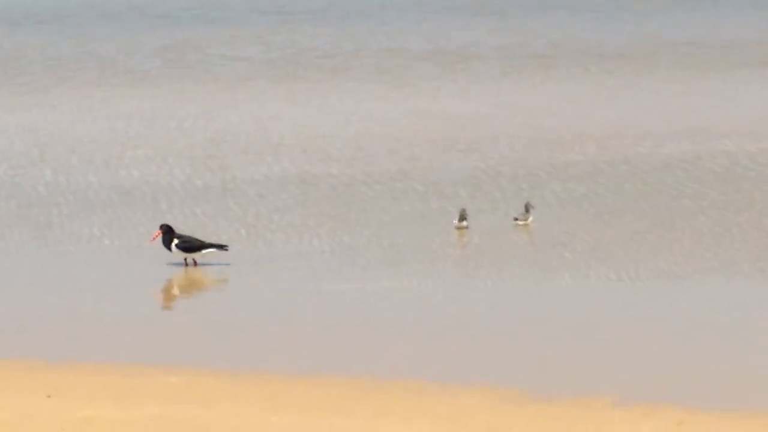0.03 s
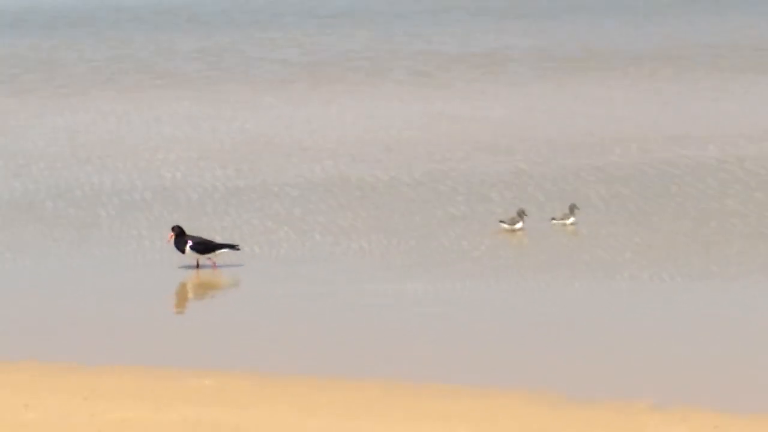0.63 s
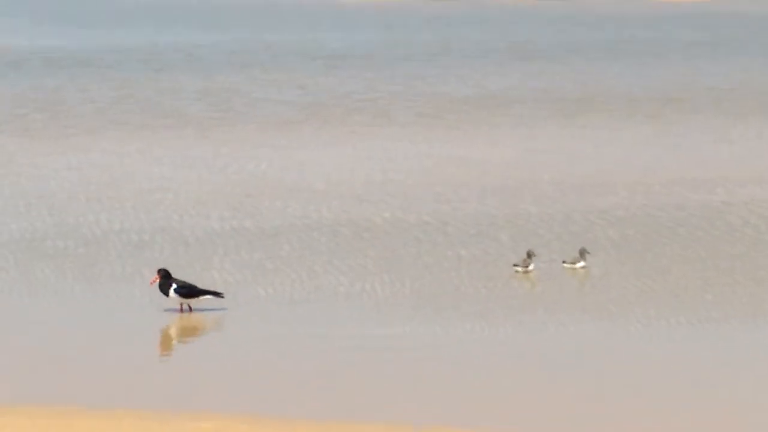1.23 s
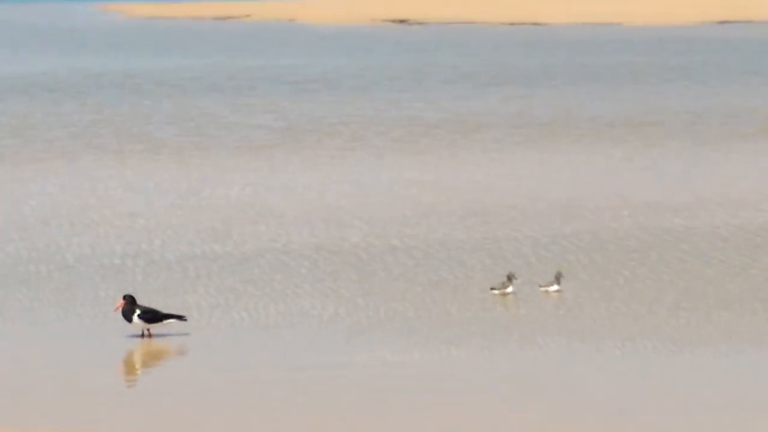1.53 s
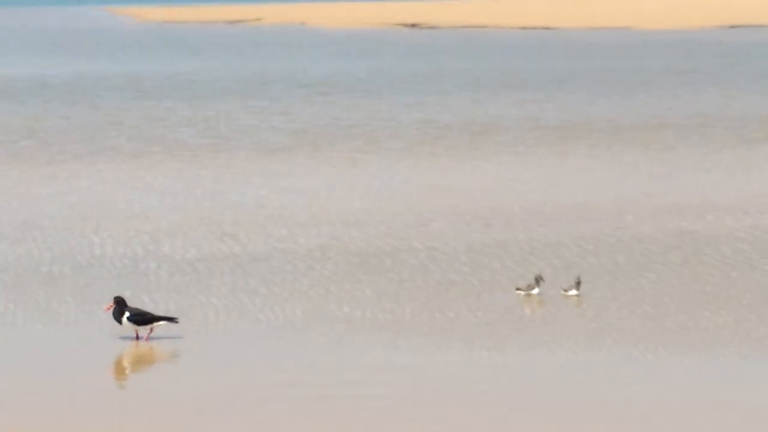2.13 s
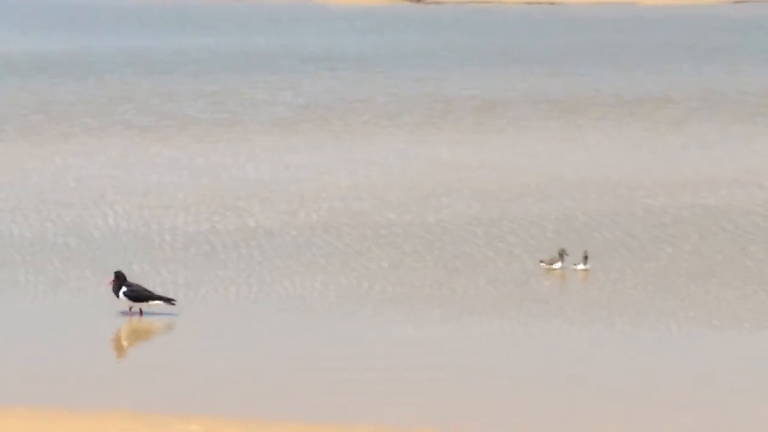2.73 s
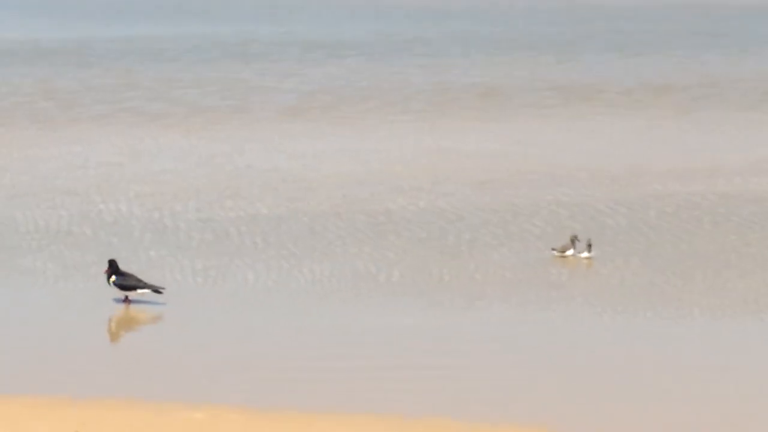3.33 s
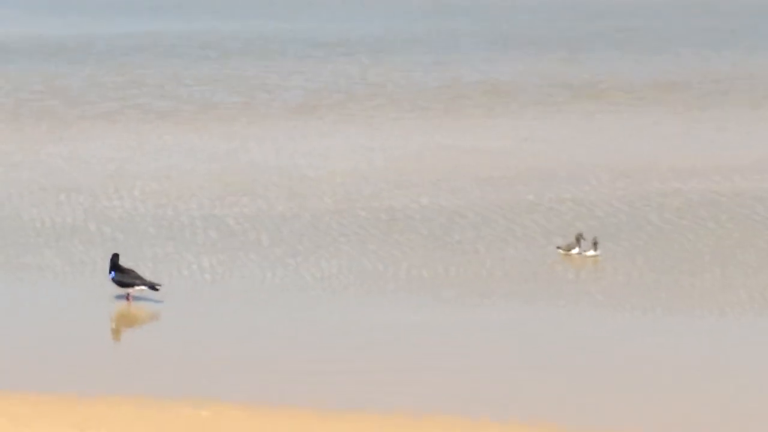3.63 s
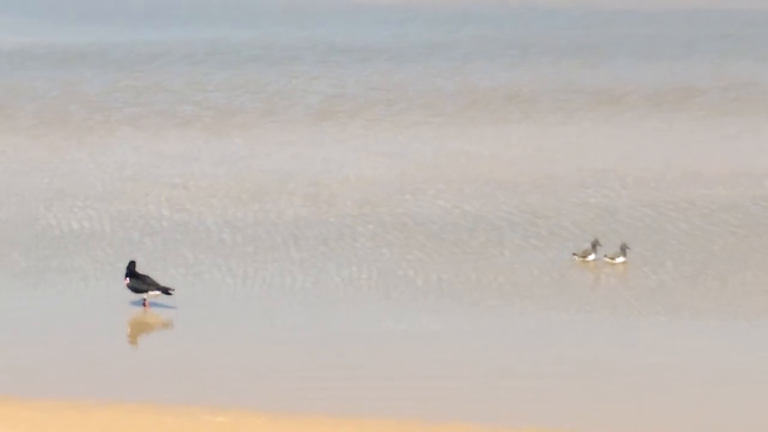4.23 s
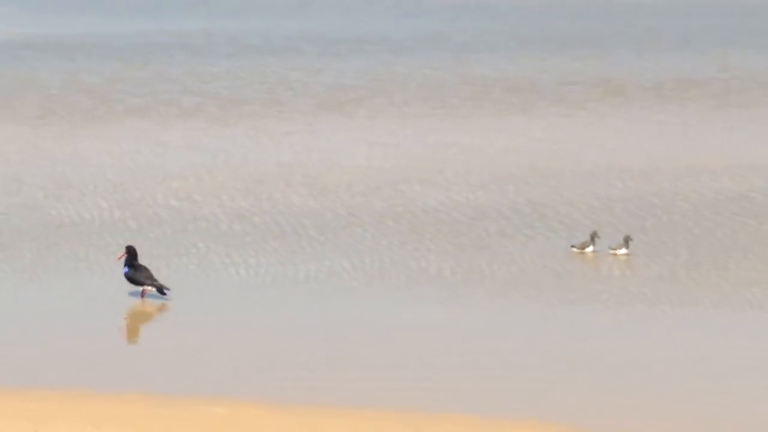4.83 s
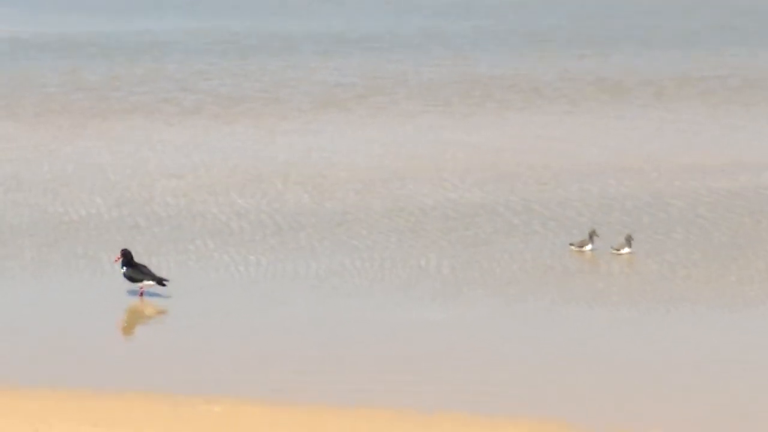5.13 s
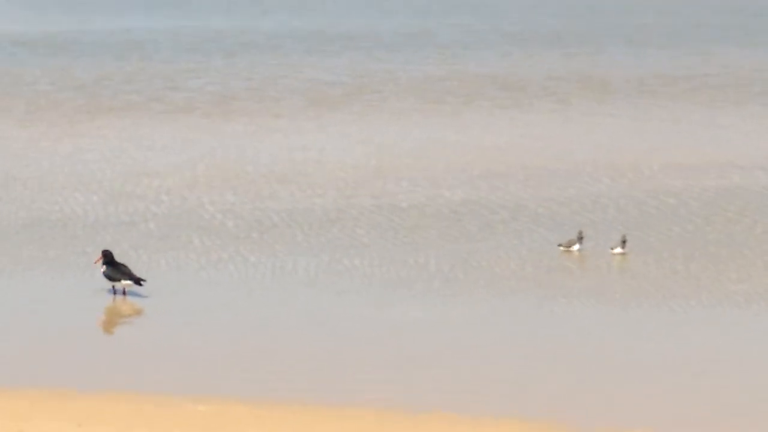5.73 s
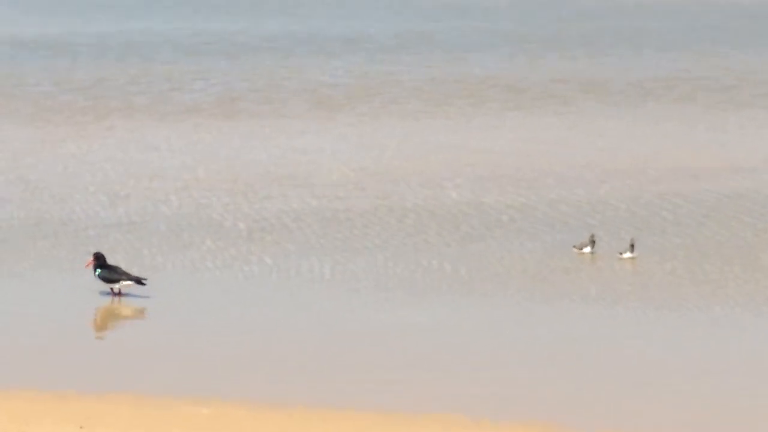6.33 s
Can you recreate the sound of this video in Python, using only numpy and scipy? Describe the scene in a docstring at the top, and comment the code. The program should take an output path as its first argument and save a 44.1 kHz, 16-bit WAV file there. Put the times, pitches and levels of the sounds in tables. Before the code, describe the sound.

Low wind rumbles on the microphone from start to finish, about six and a half seconds, heavier on the left and surging several times a second. Irregular short thumps strike each side separately. Gusts sputter on the right during the first second, again around 3 and 3.7 seconds, and more softly later. Underneath, distant water makes a faint, even hiss.

A shorebird on the open tidal flat gives four single, sharp, high pips, at about 0.2, 1.1, 3.1 and 5.4 seconds. Each is very brief, rising and falling quickly in pitch with a bright, slightly rough edge. The first two are the strongest and the third is the softest. At about 5.7 seconds a farther bird gives one much fainter short whistle that slurs up and then down. The calls leave only a slight, short, dull echo.

```python
"""Wind rumbles and buffets two microphone ports, each on its own, over a soft, steady hiss. The wind is
turbulent noise plus eddies, each a brief pressure dip. An oystercatcher gives four sharp pips on the tidal
flat: arched notes whose overtones sweep through its throat resonances. Near the end a farther shorebird
whistles once. Sand and ripples return a faint echo of both birds."""
import sys
import numpy as np
from scipy import signal
from scipy.fft import rfft, irfft
from scipy.io import wavfile
from scipy.ndimage import uniform_filter1d

SR = 44100
rng = np.random.default_rng(int(sys.argv[2]) if len(sys.argv) > 2 else 0)


def transcribe(signal):
    """Save signal, clipped to [-1, 1], as a 16-bit WAV file at the path in sys.argv[1]."""
    frames = np.atleast_2d(signal).T
    limited = np.clip(frames, -1, 1)
    pcm = np.round(limited * 32767).astype(np.int16)
    wavfile.write(sys.argv[1], SR, pcm)


N = 290178
TIME_S = np.arange(N) / SR

# Wind strength on the ports. Each row: time in seconds, left level in dB, right level in dB.
BREEZE_DB = [(0.0, -12.5, -27), (0.15, -24.5, -28.5), (0.3, -19.5, -29.5), (0.7, -15.5, -28.5),
             (1.0, -22.5, -29), (1.25, -17.5, -27.5), (1.6, -21, -31), (2.0, -27.5, -31), (2.2, -24, -28.5),
             (2.65, -21.5, -35), (2.92, -20, -23), (3.5, -20, -33.5), (4.05, -18.5, -29),
             (4.55, -20.5, -33.5), (5.25, -20, -28.5), (5.8, -19, -29), (6.15, -20, -32.5),
             (6.58, -18.5, -30.5)]
# Rumble spectrum. Each row: frequency in Hz, relative density in dB.
RUMBLE_SPECTRUM = [(10, -33.5), (22, -17), (43, -5.5), (70, 2), (105, -3), (150, -4.5), (220, -9.5),
                   (330, -14.5), (500, -24), (750, -40.5), (1200, -50), (2500, -87)]
# Deep bass of the rumble. Each row: time in seconds, gain in dB.
DEEP_BASS_DB = [(0, 1), (.7, 2.5), (1.2, 1.5), (1.8, -1), (2.2, 4), (2.8, -2), (4.1, 1), (4.7, -3),
                (5.3, 2), (6.58, -3.5)]
# Port response to eddies. Each row: frequency in Hz, gain in dB.
PORT_RESPONSE = [(200, 1), (350, 0.5), (550, 0), (780, 1), (1050, 1), (1500, 0.5), (2500, -2.5),
                 (4000, -6.5), (7000, -11.5), (12000, -41)]
# Port low end, left then right. Each row: bass cut in Hz, wake strength as a factor.
PORT_LOW_END = [(81.5, 0.36), (58.7, 0.71)]
# Small buffets, left then right. Each row: rate per second, level re the breeze in dB, roll-off in Hz.
SMALL_BUFFETS = [(11, -5.5, 165), (9, -7, 240)]
# Steady hiss. Each row: time in seconds, left and right level in dB before trim.
HISS_DB = [(0, -66, -64), (2, -66, -64.5), (4.4, -66.5, -64.5), (5.4, -64, -63), (6.58, -66, -63.5)]
# Hiss spectrum. Each row: frequency in Hz, relative density in dB.
HISS_SPECTRUM = [(100, -8), (500, 5.5), (1000, 0), (1600, 1.5), (2300, -0.5), (3200, -5), (4500, -11),
                 (6000, -15), (9000, -17), (13000, -18.5), (15700, -20.5)]
# Hard buffets. Each row: centre in seconds, port (0 left, 1 right), level in dB before trim,
# roll-off in Hz, spread in seconds.
HARD_BUFFETS = [(.092, 1, -13.5, 800, .0018), (.096, 1, -22, 480, .002), (.113, 1, -29, 647, .0048),
                (.176, 1, -21.5, 440, .0011), (.224, 1, -21, 160, .002), (.245, 1, -13, 198, .006),
                (.249, 0, -15, 200, .0015), (.266, 1, -19.5, 650, .002), (.273, 0, -16.5, 200, .0012),
                (.279, 1, -22, 520, .002), (.304, 0, -17, 190, .002), (.305, 1, -22, 330, .002),
                (.315, 1, -22, 720, .001), (.321, 1, -21, 380, .002), (.335, 0, -16, 200, .002),
                (.357, 1, -23.5, 690, .002), (.410, 1, -26, 400, .002), (.428, 1, -24, 280, .002),
                (.450, 1, -32, 480, .002), (.481, 0, -19, 150, .002), (.496, 0, -20.5, 320, .001),
                (.523, 1, -17.5, 250, .003), (.555, 1, -11.5, 520, .0009), (.573, 1, -30, 560, .001),
                (.615, 0, -18, 160, .0029), (.619, 1, -17.5, 410, .006), (.624, 1, -25, 650, .0006),
                (.629, 0, -18, 190, .002), (.698, 0, -16, 160, .002), (.714, 1, -26, 340, .002),
                (.719, 0, -13, 230, .0069), (.737, 1, -19, 600, .0007), (.782, 1, -22, 1200, .0016),
                (.787, 1, -14.5, 300, .003), (.807, 1, -25, 260, .003), (.815, 0, -20, 150, .002),
                (.945, 0, -14, 370, .0018), (.98, 0, -12, 260, .005), (.993, 0, -17.5, 280, .0015),
                (1.035, 1, -33, 330, .0015), (1.119, 0, -19, 200, .003), (1.198, 0, -14.5, 200, .003),
                (1.224, 0, -18, 140, .002), (1.241, 0, -16, 160, .002), (1.259, 1, -21.5, 440, .0012),
                (1.299, 0, -21, 280, .0012), (1.403, 0, -18, 140, .002), (1.454, 1, -25.5, 480, .0012),
                (1.464, 1, -29, 380, .002), (1.494, 1, -25, 290, .002), (1.569, 1, -27, 260, .0015),
                (1.662, 0, -20, 140, .003), (1.732, 0, -20, 165, .002), (1.806, 0, -24, 200, .003),
                (1.864, 0, -13, 200, .003), (1.893, 0, -19.5, 190, .003), (2.062, 0, -16.5, 230, .0023),
                (2.10, 0, -23, 242, .007), (2.127, 0, -19, 190, .002), (2.255, 0, -25, 210, .003),
                (2.281, 0, -21, 175, .005), (2.351, 0, -23, 140, .002), (2.431, 0, -23.5, 210, .002),
                (2.487, 0, -13, 195, .0012), (2.524, 0, -18.5, 200, .009), (2.702, 0, -17, 190, .0015),
                (2.811, 1, -19, 470, .0015), (2.825, 1, -26, 380, .0015), (2.849, 0, -19, 185, .002),
                (2.868, 1, -22.5, 420, .001), (2.901, 0, -15.5, 151, .014), (2.932, 1, -21, 290, .003),
                (2.962, 1, -19.5, 480, .00094), (2.979, 1, -20, 500, .004), (2.981, 1, -16, 140, .0027),
                (2.984, 0, -10.5, 210, .0027), (3.025, 1, -16.5, 720, .0009), (3.029, 1, -19, 180, .0015),
                (3.113, 1, -24.5, 600, .0016), (3.158, 0, -19.5, 188, .0024), (3.193, 0, -22.5, 170, .004),
                (3.37, 0, -21, 130, .002), (3.435, 0, -20, 160, .002), (3.465, 0, -19.5, 160, .002),
                (3.541, 0, -20, 150, .005), (3.564, 1, -31, 370, .0015), (3.686, 0, -21, 208, .0048),
                (3.706, 1, -17.5, 640, .002), (3.715, 1, -22, 720, .002), (3.726, 1, -20, 700, .0008),
                (3.731, 0, -16.5, 200, .003), (3.747, 1, -32, 420, .001), (3.80, 1, -31, 320, .003),
                (3.828, 1, -24, 480, .0016), (3.845, 1, -29, 270, .002), (3.941, 1, -27, 400, .004),
                (3.945, 0, -16, 170, .005), (4.001, 0, -12, 270, .0024), (4.071, 1, -24.5, 340, .004),
                (4.189, 0, -19, 220, .0051), (4.226, 1, -30, 450, .002), (4.264, 1, -27, 500, .0016),
                (4.626, 0, -17, 161, .007), (4.745, 0, -17.5, 156, .0091), (4.85, 0, -25, 190, .004),
                (4.953, 1, -24, 450, .0011), (4.981, 0, -12, 165, .0016), (4.988, 1, -22, 950, .0014),
                (5.008, 1, -24, 420, .002), (5.037, 1, -27, 480, .0012), (5.054, 1, -22, 460, .003),
                (5.118, 0, -16, 173, .0022), (5.118, 1, -27, 420, .002), (5.189, 0, -21, 250, .003),
                (5.227, 0, -21, 213, .0033), (5.283, 0, -20, 120, .003), (5.304, 0, -17.5, 240, .005),
                (5.367, 0, -16, 190, .002), (5.378, 0, -19, 250, .003), (5.553, 0, -17, 165, .002),
                (5.554, 1, -27, 370, .0015), (5.697, 0, -21.5, 260, .0057), (5.757, 0, -13.5, 290, .005),
                (5.79, 1, -32, 420, .002), (5.804, 1, -31, 450, .002), (5.817, 1, -31, 560, .002),
                (5.853, 1, -27, 260, .003), (5.897, 1, -25, 400, .0015), (5.911, 1, -21.5, 400, .003),
                (6.0, 1, -27, 180, .002), (6.083, 0, -17.5, 184, .0042), (6.202, 0, -18, 200, .002),
                (6.364, 0, -24.5, 190, .0022), (6.486, 0, -19, 125, .002), (6.516, 1, -17, 470, .0007),
                (6.553, 1, -21, 300, .0029), (6.57, 1, -21.5, 420, .0006)]
# Pips. Each row: start in seconds, length in seconds, top pitch in Hz, level in dB before the throat,
# tilt in dB per harmonic, octave gain in dB, lean (under 1 rises sooner), half the break's dip in dB.
PIP_NOTES = [(.2325, .046, 2195, -29, .3, 7, .84, -6), (1.119, .053, 2120, -29, .3, 3, 1, -1),
             (3.138, .047, 2095, -36.5, -.4, 3, .97, -.5), (5.389, .043, 2165, -32.5, -.3, 2.5, .97, 0)]
# Arch of a pip. Each row: share of the length, pitch as a factor on the top, note level in dB,
# upper overtone level in dB.
PIP_ARCH = [(0, .57, -22, -50), (.14, .72, -13, -28), (.2, .82, -9, -7), (.28, .94, -2, -2),
            (.39, .985, 0, 0), (.53, 1, 0, 0), (.69, .982, -.5, -2), (.8, .94, -3, -8), (.9, .85, -13, -34),
            (1, .79, -26, -50)]
# Throat response at the ports. Each row: frequency in Hz, left gain in dB, right gain in dB.
THROAT_RESPONSE = [(1200, -11, -2), (1750, 0, -8.5), (1960, -3, 1.5), (2090, -5, -1.5), (2170, -3.5, -1.5),
                   (2304, -5, 1), (2930, -9.5, -15), (3920, -26.5, -27.5), (4400, -30.5, -38.5),
                   (5200, -33, -43), (6830, -25.5, -33), (7640, -22.5, -40), (8520, -23.5, -40),
                   (9350, -9, -22), (10700, -32, -40), (12700, -35, -44), (15500, -51, -56)]
# Overtones a softer pip sheds. Each entry: harmonic number, loss in dB per dB under full voice.
SHED_DB_PER_DB = {3: .7, 6: 2.2, 7: 3}
# Right-port gusts. Each row: centre in seconds, length in seconds, level in dB before trim,
# roll-off in Hz.
RIGHT_GUSTS = [(0.326, 0.067, -24.5, 400), (0.491, 0.16, -29, 333), (0.7, 0.066, -29, 300),
               (0.789, 0.056, -26, 484), (2.963, 0.061, -22.5, 404), (3.715, 0.028, -25, 680),
               (4.235, 0.12, -35.5, 430), (5.048, 0.18, -37, 610), (5.864, 0.11, -33, 440),
               (6.539, 0.063, -33.5, 450)]
# Far whistle. Each row: time in seconds, pitch in Hz, note level in dB, octave level in dB.
WHISTLE_CONTOUR = [(5.678, 2050, -66, -82), (5.69, 2380, -60, -70), (5.703, 2900, -60, -70),
                   (5.712, 2960, -61, -73), (5.721, 2950, -65, -76), (5.735, 2990, -61, -74),
                   (5.745, 2900, -60, -75), (5.758, 2650, -56, -74), (5.78, 2500, -54.5, -74),
                   (5.797, 2310, -58, -73.5), (5.81, 2200, -74, -86)]


def amp(db):
    """Decibels to gain."""
    return 10 ** (np.asarray(db) / 20)


def unit(x):
    """Scales to rms 1."""
    return x / np.sqrt(np.mean(x ** 2) + 1e-20)


def curve(rows, at, column):
    """Interpolates a table column along the first."""
    rows = np.asarray(rows)
    return np.interp(at, rows[:, 0], rows[:, column])


def colour(rows, hz, column=1):
    """Gain of a spectrum, read on a log-frequency axis."""
    rows = np.asarray(rows)
    return amp(np.interp(np.log(hz + 1), np.log(rows[:, 0]), rows[:, column]))


def noise(gain):
    """Noise of rms 1 with spectrum gain(Hz)."""
    return unit(irfft(rfft(rng.standard_normal(N)) * gain(np.fft.rfftfreq(N, 1 / SR)), N))


def drift(hz):
    """Random wander of rms 1, bandwidth about hz."""
    return noise(lambda f: np.exp(-(f / hz) ** 2))


def add(mix, start_s, sound):
    """Mixes a sound in from start_s."""
    part = mix[max(round(start_s * SR), 0):][:len(sound)]
    part += sound[:len(part)]


def add_centred(mix, centre_s, sound):
    """Mixes a sound in around centre_s."""
    add(mix, centre_s - len(sound) / 2 / SR, sound)


def wind(port, surge_db=4.5, surge_hz=5):
    """Rumble and small buffets surge together a few times a second."""
    return (rumble(port) + flurry(port)) * amp(surge_db * np.tanh(drift(surge_hz)))


def rumble(port, trim_db=-4, split_hz=260, deep_hz=70, large_swing_db=5, small_swing_db=7.5):
    """Turbulence on one port; small, higher eddies come and go more than large ones."""
    speed = np.tanh(drift(hz=32))
    turbulence = noise(lambda f: colour(RUMBLE_SPECTRUM, f))
    small = signal.sosfiltfilt(signal.butter(2, split_hz, "high", fs=SR, output="sos"), turbulence)
    large = turbulence - small
    flow = unit(large * amp(large_swing_db * speed) + small * amp(small_swing_db * (speed - 1.5)))
    deep = signal.sosfiltfilt(signal.butter(2, deep_hz, fs=SR, output="sos"), flow)
    flow = flow - deep + deep * amp(curve(DEEP_BASS_DB, TIME_S, 1))
    return amp(curve(BREEZE_DB, TIME_S, port + 1) + trim_db) * flow


def swarm(spread_s, per_s=2400, size=6144):
    """Cluster of eddy impulses of random strength, strongest mid-way, energy under 1."""
    t = (np.arange(size) - size // 2) / SR
    eddies = rng.standard_normal(size) * (rng.random(size) < per_s / SR) * np.exp(-(t / spread_s) ** 2)
    return eddies / (np.linalg.norm(eddies) + .087)


def pressure(eddies, rolloff_hz, port, knee_hz=170, wake_hz=110):
    """Each eddy is a smooth pressure dip with an exponential spectrum, trailed by a broad, slow wake."""
    cut_hz, wake = PORT_LOW_END[port]
    f = np.fft.rfftfreq(len(eddies), 1 / SR)
    dip = (np.exp(-f / rolloff_hz) + wake * np.exp(-f / wake_hz)) / np.sqrt(1 + 1j * f / knee_hz)
    bass_cut = (1j * f / (cut_hz + 1j * f)) ** 2  # makes the dip swing back
    spectrum = rfft(eddies) * dip * colour(PORT_RESPONSE, f) * bass_cut
    return irfft(spectrum, len(eddies)) * signal.windows.tukey(len(eddies), .1)


def thud(db, rolloff_hz, spread_s, port):
    """One buffet: a large eddy amid a cluster, shreds breaking off, and slow churn."""
    shred_db, shred_lag_s, churn_db = -14, .002, -9.5
    balance_s, rms_window_s = .0028, .018
    # the longer the buffet, the more its cluster outweighs the large eddy
    eddies = np.sqrt(spread_s / balance_s) * swarm(2.43 * spread_s)
    eddies[len(eddies) // 2] -= 1  # the large eddy
    strength = np.linalg.norm(eddies)
    shreds = amp(shred_db) * strength * np.roll(swarm(spread_s=.008), round(shred_lag_s * SR))
    churn = amp(churn_db) * strength * swarm(spread_s=.015)
    pulse = pressure(eddies, rolloff_hz, port)
    pulse += pressure(shreds, 1.1 * rolloff_hz, port)
    pulse += pressure(churn, .55 * rolloff_hz, port)
    return amp(db) * np.sqrt(rms_window_s * SR) * pulse / np.linalg.norm(pulse)


def flurry(port, scatter_db=2, scatter_octaves=.4, spread_s=.0023):
    """Small buffets shed at loose intervals, following the wind strength on their port."""
    per_s, offset_db, rolloff_hz = SMALL_BUFFETS[port]
    out = np.zeros(N)
    for k, (late, strength, sharpness, width) in enumerate(rng.uniform(-1, 1, size=(128, 4))):
        centre_s = (k + (1 + late) / 2) / per_s
        if centre_s < TIME_S[-1]:
            db = curve(BREEZE_DB, centre_s, port + 1) + offset_db + scatter_db * strength
            sound = thud(db, rolloff_hz * 2 ** (scatter_octaves * sharpness), spread_s * 2 ** width, port)
            add_centred(out, centre_s, sound)
    return out


def hiss(port, trim_db=4.5, waver_db=1):
    """A soft, even hiss on one port."""
    db = curve(HISS_DB, TIME_S, port + 1) + trim_db + waver_db * drift(hz=19)
    return amp(db) * noise(lambda f: colour(HISS_SPECTRUM, f))


def buffets(trim_db=1):
    """Hard buffets, each striking one port."""
    out = np.zeros((2, N))
    for centre_s, port, db, rolloff_hz, spread_s in HARD_BUFFETS:
        add_centred(out[port], centre_s, thud(db + trim_db, rolloff_hz, spread_s, port))
    return out


def pips():
    """A near-pure note arches; overtones break in on the rise and sweep through throat resonances."""
    full_voice_db, rasp_db, uneven_db, jitter = -29, -18, 2.5, .005
    break_at, break_width = .58, .1  # shares of the arch
    apart_rad, apart_rad_per_hz, middle_hz = 2.38, .0036, 2100
    waver, flutter, uneven = drift(hz=900), drift(hz=1500), drift(hz=120)
    out = np.zeros((2, N))
    for start_s, length_s, top_hz, db, tilt_db, octave_db, lean, half_dip_db in PIP_NOTES:
        progress = np.arange(0, 1, 1 / (length_s * SR)) ** lean
        size = len(progress)
        now = round(start_s * SR) + np.arange(size)
        arch = uniform_filter1d(curve(PIP_ARCH, progress, 1), size=100, mode="nearest")
        hz = top_hz * arch * (1 + jitter * waver[now])
        phase = 2 * np.pi * np.cumsum(hz) / SR
        note_db, upper_db = curve(PIP_ARCH, progress, 2), curve(PIP_ARCH, progress, 3)
        # roughest where overtones break in and drop out
        rasp = 1 + np.minimum(amp(rasp_db - upper_db), .5) * flutter[now]
        # at the voice break the fundamental dips and turns ragged
        in_break = np.exp(-((progress - break_at) / break_width) ** 2)
        fundamental = amp(note_db + half_dip_db * in_break * (2 + waver[now] / 2))
        # the ports near opposite phase as the note rises
        lag_rad = apart_rad + apart_rad_per_hz * (hz - middle_hz)
        for port in range(2):
            note = fundamental * colour(THROAT_RESPONSE, hz, port + 1) * np.sin(phase - port * lag_rad)
            for k in range(2, 8):
                base_db = note_db + octave_db if k == 2 else upper_db
                shed_db = min(db - full_voice_db, 0) * SHED_DB_PER_DB.get(k, 0)
                swell_db = uneven_db * uneven[(now + k * size) % N]
                gain = amp(base_db + (k - 7.5) * tilt_db + shed_db + swell_db) * rasp
                throat = colour(THROAT_RESPONSE, k * hz, port + 1)
                note += gain * throat * np.sin(k * phase + port * np.pi / 2)
            add(out[port], start_s, np.sqrt(2) * amp(db) * note * signal.windows.tukey(size, .1))
    return out


def shore_echo(sound, cutoff_hz=4000, t60_s=.26, wet_db=-24):
    """Sand and ripples scatter back a faint, short, dull tail."""
    t = np.arange(SR // 2) / SR
    tail = rng.standard_normal((2, len(t))) * amp(-60 * t / t60_s)
    tail /= np.linalg.norm(tail[0])
    tail = signal.sosfilt(signal.butter(2, cutoff_hz, fs=SR, output="sos"), tail)
    return amp(wet_db) * signal.fftconvolve(sound, tail, axes=1)[:, :N]


def gusts(trim_db=-1):
    """Longer streams of small eddies sputter across the right port."""
    out = np.zeros((2, N))
    for centre_s, length_s, db, rolloff_hz in RIGHT_GUSTS:
        rasp = pressure(swarm(length_s / 2, per_s=230, size=16384), rolloff_hz, port=1)
        rasp *= np.sqrt(length_s * SR) / (np.linalg.norm(rasp) + 1e-12)
        add_centred(out[1], centre_s, amp(db + trim_db) * rasp)
    return out


def whistle(jitter=.007, flicker_db=2, right_db=-3, lag_samples=6):
    """A far bird's slurred note and octave, made unsteady by the air; later and softer on the right."""
    hz, note_db, octave_db = (curve(WHISTLE_CONTOUR, TIME_S, column) for column in (1, 2, 3))
    phase = 2 * np.pi * np.cumsum(hz * (1 + jitter * drift(hz=276))) / SR
    note = amp(note_db) * np.sin(phase) + amp(octave_db) * np.sin(2 * phase)
    gate = (TIME_S > WHISTLE_CONTOUR[0][0]) * (TIME_S < WHISTLE_CONTOUR[-1][0])
    left = np.sqrt(2) * note * amp(flicker_db * drift(hz=80)) * gate
    return np.array([left, amp(right_db) * np.roll(left, lag_samples)])


def scene():
    """Birds and their faint echo, with wind and hiss on each port."""
    birds = pips() + whistle()
    events = birds + shore_echo(birds) + buffets() + gusts()
    return events + np.array([wind(port) + hiss(port) for port in range(2)])


def record(dry):
    """Soft clipping rounds the hardest thumps; a low-pass limits the band."""
    ceiling, cutoff_hz = .95, 15700
    rounded = dry / (1 + (dry / ceiling) ** 4) ** (1 / 4)
    lowpass = signal.firwin(511, cutoff_hz, window=("kaiser", 9), fs=SR)
    return signal.oaconvolve(rounded, lowpass[None], "same")


dry = scene()
out = record(dry)
transcribe(out)
```